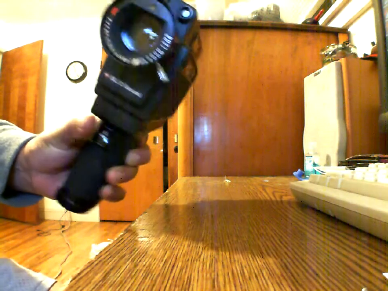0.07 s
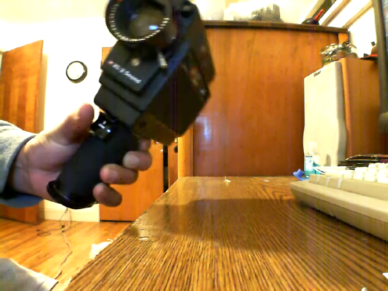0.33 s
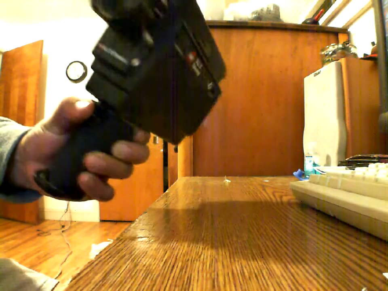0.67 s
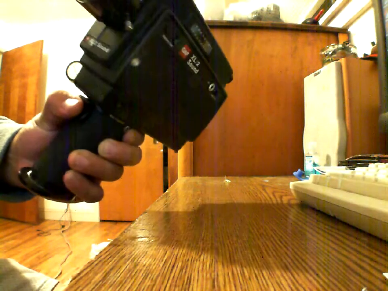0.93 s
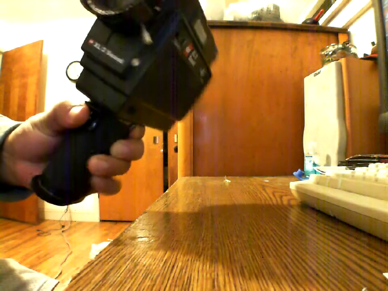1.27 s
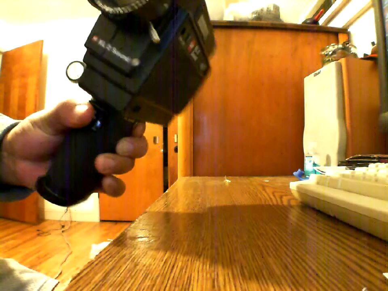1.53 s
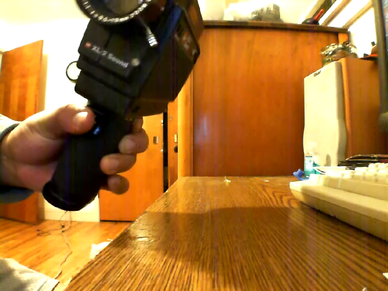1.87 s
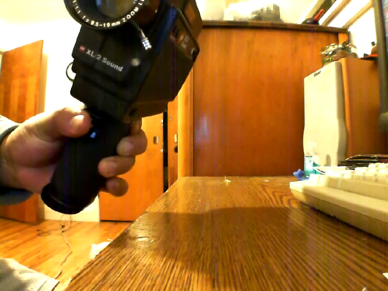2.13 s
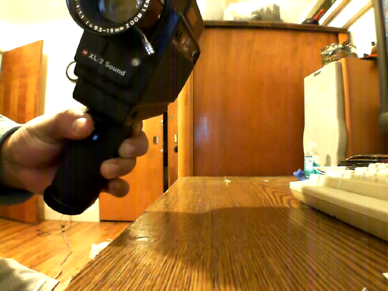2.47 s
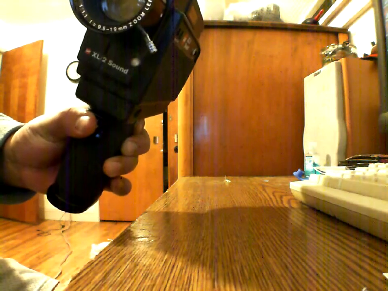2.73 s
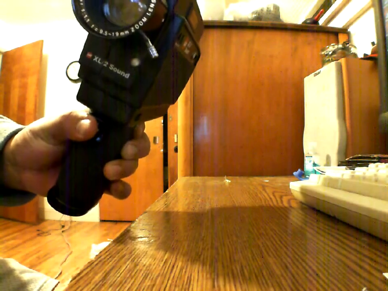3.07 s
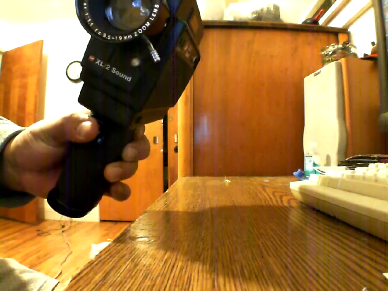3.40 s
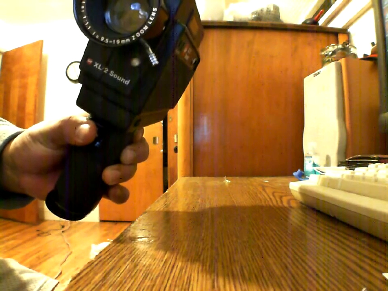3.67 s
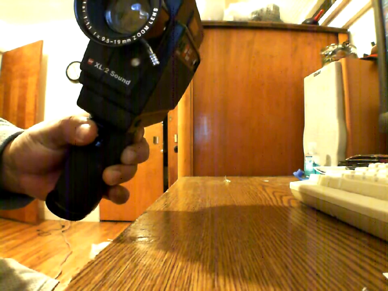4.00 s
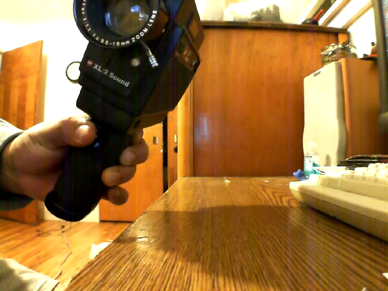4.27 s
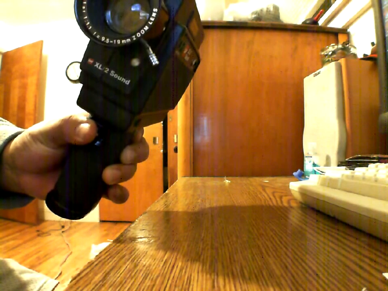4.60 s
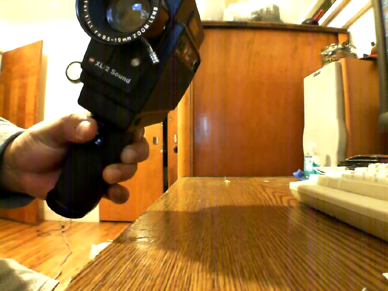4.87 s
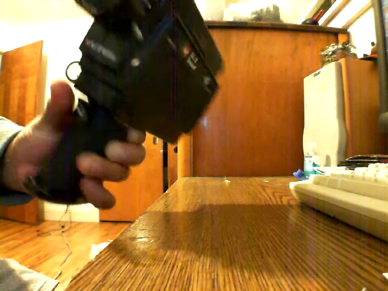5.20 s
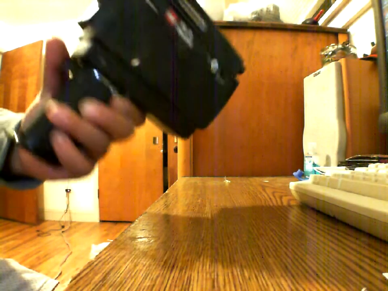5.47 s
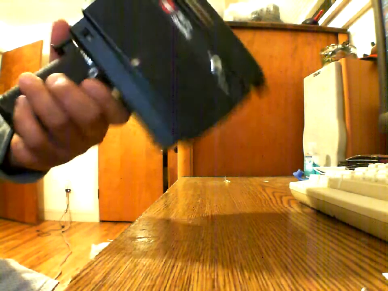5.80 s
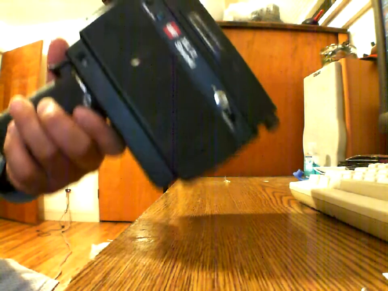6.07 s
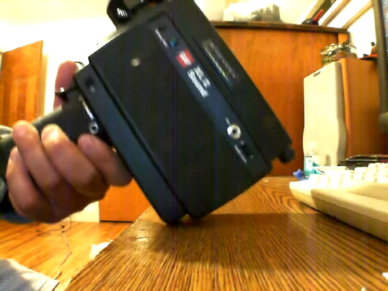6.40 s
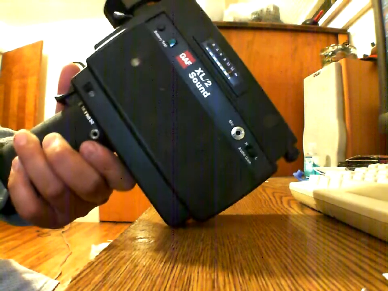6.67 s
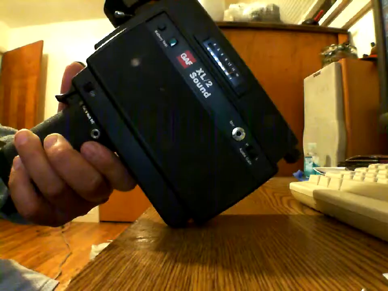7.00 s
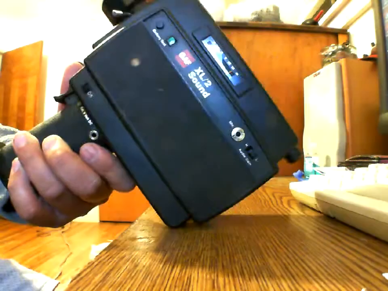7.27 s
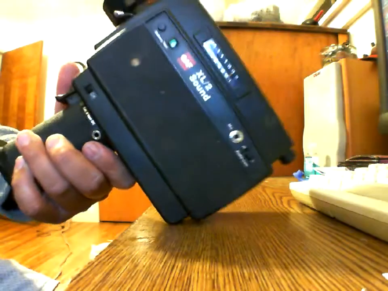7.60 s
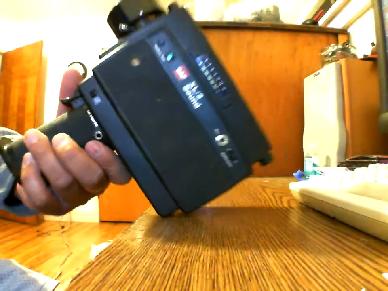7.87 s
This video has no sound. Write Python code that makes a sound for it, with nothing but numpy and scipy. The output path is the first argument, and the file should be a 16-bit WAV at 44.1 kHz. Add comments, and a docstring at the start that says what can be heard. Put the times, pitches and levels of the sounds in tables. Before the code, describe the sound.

A hand-held film camera is heard close up in a small room, over faint hiss, a low hum and a thin high whine. Its plastic grip gives a few tiny creaks, then at about 0.8 seconds the trigger latches with a small ping and the motor starts. The gears whirr steadily with fine, rapid ticking, about seventeen ticks a second, slowing very slightly. A dull knock comes near 1 second, and more soft knocks and rubs on a wooden table join between 3.2 and 4.3 seconds. At 5 seconds the trigger springs back with a loud, sharp click and the motor stops. A few light creaks and a soft knock follow. At 6.5 seconds the camera lands on the table with a brief chatter and a low wooden boom. Small plastic clicks, light taps and faint rubbing across the wood continue until about 8 seconds.

```python
"""A hand-held home-movie camera close to a desk microphone, over the air and hum of a small room.
The plastic grip creaks in tiny slips, then the trigger latches with a ping. For four seconds the gears
whirr and the claw ticks through the case about 17 times a second, joined late by dull knocks and rubs
on a wooden table. At 5 s the trigger cracks back and the motor stops. At 6.5 s the camera lands with
a chatter and a boom of the table, then is shifted a little across the wood."""
import sys
import numpy as np
from scipy import signal
from scipy.fft import rfft, irfft
from scipy.io import wavfile

SR = 44100
rng = np.random.default_rng(int(sys.argv[2]) if len(sys.argv) > 2 else 0)


def bounce(signal):
    """Save signal as a 16-bit WAV file at the path given by the first command-line argument."""
    frames = np.transpose(np.atleast_2d(signal))
    limited = np.clip(frames, -1, 1)
    pcm = np.round(limited * 32767).astype(np.int16)
    wavfile.write(sys.argv[1], SR, pcm)


N = 350154
TIME = np.arange(N) / SR

# claw and shutter contacts within one film frame: share of the cycle, level/dB
CLAW_CONTACTS = [(.0, -8), (0.048, -5.5), (0.152, -16), (0.368, -6), (.43, -6.5), (.57, -13.5), (.86, -7),
                 (.93, -2.5)]
# resonances of the camera case: f/Hz, width/Hz, level/dB
CASE_RESONANCES = [(432, 18, 10), (705, 100, -0.5), (846, 177, 0), (1283, 56, -3), (1424, 52, 2.5),
                   (2074, 120.4, -2.5), (2290, 300, -6.5), (2903, 39, -1.5), (3170, 320, -7.5),
                   (3900, 1100, -7), (4480, 510, -7.5), (4670, 250, -8), (5260, 180, -10.5),
                   (6270, 170, -12.5), (7280, 440, -15.5), (8900, 400, -22)]
# spectrum of the claw's bright tick: f/Hz, level/dB
TICK_COLOUR = [(700, -17.5), (2000, 2.5), (2700, -2.5), (3400, 7.5), (4050, -1), (4700, 7), (4950, -16),
               (5300, -3.5), (6500, -7), (7400, -3), (8300, -9), (9100, -7.5), (9600, -11.5), (15000, -19)]
# the trigger latches in two steps: t/s, level/dB, treble roll-off/Hz
LATCH_STEPS = [(0.8412, -40, 6000), (.853, -45.5, 6000)]
# the latch spring's ping: f/Hz, level/dB, t60/s
LATCH_MODES = [(3256, 4.5, 0.041), (3900, -15, .04)]
# the trigger springs back, hits its stop (second row) and rebounds: t/s, level/dB, t60/s
RELEASE_CONTACTS = [(5.0027, -23, 0.076), (5.0064, -4, 0.014), (5.0095, -20.5, 0.024), (5.026, -39, .025),
                    (5.0448, -18, 0.024)]
# spectrum of the trigger's crack: f/Hz, level/dB
RELEASE_COLOUR = [(250, -34), (420, -7), (620, -22.5), (820, -9), (1000, -31), (1290, -8), (1700, -15.5),
                  (2150, -11.5), (2550, -19), (3000, -1.5), (3800, -8.5), (4500, -8), (5200, -9.5),
                  (6600, -10.5), (9500, -12), (12000, -12.5), (15500, -30.5)]
# the ring after that crack: f/Hz, level/dB, t60/s
RELEASE_MODES = [(420, -29, 0.12), (452.4, -56, 0.062), (820, -27.5, 0.051), (1300, -38, .035),
                 (2205, -29.5, 0.045), (3100, -34, .018), (4560, -11, 0.022), (5120, -6.5, .011),
                 (6500, -15.5, 0.021), (7200, -36, .02)]
# the grip creaks under the fingers: t/s, level/dB, brightness (0 dull, 1 sharp), number of slips
CREAKS = [(0.0219, -37, 0.52, 1), (0.2165, -38, 0.47, 1), (.241, -38, .38, 3), (0.3194, -37.5, 0.4, 1),
          (0.3868, -37, .35, 1), (0.662, -49.5, 0.74, 1), (1.049, -40, 0.35, 1), (1.499, -39.5, 0.4, 2),
          (4.9902, -35.5, 0.63, 1), (5.1989, -34, .28, 1), (5.738, -34.5, 0.81, 1), (5.751, -39.5, 0.45, 1),
          (6.8763, -37.5, 0.6, 1), (7.0876, -36, 0.65, 1), (7.3424, -41.5, 0.089, 1), (7.3761, -45.5, 1, 1),
          (7.469, -41.5, 1, 1)]
# spectrum of a plastic slip: f/Hz, level/dB
SLIP_COLOUR = [(590, -33), (1000, -12.5), (1470, -10.5), (1750, -8.5), (2140, -8), (2770, -8), (3090, -7.5),
               (3590, -4.5), (4300, -3.5), (5810, -6.5), (7360, -1), (8280, -6.5), (9030, 0.5),
               (11400, -17), (13000, -27)]
# ring of the grip: f/Hz, level/dB, t60/s
GRIP_MODES = [(1474, -18.5, 0.028), (2160, -17, 0.028), (3214, -10.5, 0.024), (3490, -16, 0.032),
              (4140, -5.5, 0.015), (4870, -13, 0.0043), (7400, -2, 0.011)]
# the camera lands on a corner, tips onto the next and later rocks:
# t/s, level/dB, gap between touches/s, loss per touch/dB, number of touches
LANDINGS = [(6.4797, -11.5, .01115, 4.5, 4), (6.5565, -23, .0157, 32, 3), (7.592, -41.5, .016, -2, 2)]
# dull knocks on the table: t/s, level/dB, treble roll-off/Hz, pitch the struck spot favours/Hz
KNOCKS = [(1.0507, -26.5, 850, 516), (3.1663, -27, 3500, 441), (3.199, -31.5, 700, 461),
          (3.269, -34.5, 600, 461), (3.567, -33, 3500, 700), (3.96, -33.5, 800, 714),
          (3.984, -30.5, 1100, 640), (4.017, -31, 900, 370), (4.066, -29.5, 1210, 635),
          (5.837, -33.5, 750, 370), (7.344, -38.5, 2470, 618), (7.382, -38, 1500, 630)]
# woody ring of the table top: f/Hz, level/dB, t60/s
TABLE_MODES = [(247, -19, 0.081), (369, -19.5, 0.13), (461.5, -1.5, 0.04), (515.4, -9, 0.12),
               (621, -5.5, 0.042), (700, -7.5, 0.028), (845, -9, 0.087), (913, -25.5, 0.078),
               (1240, -6, 0.026), (1650, -54, 0.0072), (2210, -5, 0.011), (2700, 0, 0.0091)]
# sway and boom of the whole table: f/Hz, level/dB, t60/s
BOOM_MODES = [(24.7, -20.5, 0.86), (53.3, -16.5, 0.48), (70.6, -2, 0.1), (91, 0.5, 0.051),
              (118, -1.5, 0.089), (170, -9.5, 0.057), (262, -4, 0.038)]
# rubbing strokes on the table: t/s, length/s, level/dB
RUBS = [(3.275, 0.15, -50), (3.534, 0.068, -49), (3.854, 0.037, -44.5), (4.017, 0.059, -42),
        (4.27, 0.052, -51.5), (5.635, .06, -56), (5.83, 0.091, -62), (6.58, 0.33, -63), (7.45, 0.056, -54),
        (7.57, .04, -46), (7.675, 0.24, -54.5)]
# spectrum of the rubbing: f/Hz, level/dB
RUB_COLOUR = [(30, -1), (60, -5.5), (110, -4), (170, -15), (280, -9), (380, -4.5), (460, 0), (560, -8),
              (700, -7.5), (900, -15), (1050, -33), (2500, -34), (6000, -55)]
# spectrum of room air and microphone hiss: f/Hz, level/dB
AIR_COLOUR = [(15, 4), (60, 2), (95, -5), (170, -6.5), (260, -6.5), (370, -9), (540, -9), (700, -17),
              (1300, -21), (3000, -25), (7000, -26.5), (11000, -25), (15700, -24.5)]
# fan hum and electrical whine: f/Hz, level/dB, width/Hz
HUMS = [(116.24, -57, 5.3), (241, -67, 17), (15735, -68.5, 8)]


def motor(start_s=.86, first_frame_s=.8943, stop_s=5.0, running_db=-49, gear_db=9.5, tick_db=-2.5):
    """Claw and shutter repeat their contacts on every frame; meshing gears whirr through the case."""
    sag_s = np.clip(TIME, 1.75, 3.95) - 1.75
    frames_per_s = 17.356 - .2836 * sag_s   # the motor slows a little under load
    frames = np.cumsum(frames_per_s) / SR
    frames -= np.interp(first_frame_s, TIME, frames)
    share, db = np.transpose(CLAW_CONTACTS)
    cycle = np.arange(int(frames[int(stop_s * SR)]) + 1)[:, None] + share
    times = np.interp(cycle, frames, TIME) + .00084 * rng.standard_normal(cycle.shape)
    gains = from_db(db + .6 * rng.standard_normal(cycle.shape))
    running = (TIME > start_s) & (TIME < stop_s)
    claw = rms_one(running * crack(pulses(times.ravel(), gains.ravel()), t60=.031))
    teeth = rms_one(running * rng.standard_normal(N) * (rng.random(N) < 3000 / SR))
    drive = claw + from_db(gear_db) * teeth + 1e-18
    case = sum((-1) ** k * from_db(level) * resonate(drive, hz, width)
               for k, (hz, width, level) in enumerate(CASE_RESONANCES))
    whirr = rms_one(case) + from_db(tick_db) * colour(claw, TICK_COLOUR)
    spin_up_db = -6 * np.exp(-np.maximum(TIME - start_s, 0) / .067)   # swells as the gears take the load
    return from_db(running_db + spin_up_db) * rms_one(whirr) * np.sqrt(running.mean())


def trigger(crack_db=-1.5, ring_db=3.5, soft_hz=9020):
    """The trigger latches with a small ping; released, it cracks against its stop and rings the case."""
    ping = strike(LATCH_STEPS, LATCH_MODES, spread_db=1)
    contacts = sum(crack(pulses([s], [from_db(db)]), t60) for s, db, t60 in RELEASE_CONTACTS)
    impact_s = RELEASE_CONTACTS[1][0]
    ring = strike([(impact_s, ring_db, soft_hz)], RELEASE_MODES, spread_db=0)
    return ping + from_db(crack_db) * colour(contacts, RELEASE_COLOUR) + ring


def slips(creak_gap_s=.0167, loss_db=1):
    """Fingers, trigger and landings make the shell slip: rows of t/s, level/dB, brightness."""
    creaks = [(s + k * creak_gap_s, db - k * loss_db, bright)
              for s, db, bright, count in CREAKS for k in range(round(count))]
    tightening_hand = [(s, -46.5, .3) for s in rng.uniform(.59, .71, size=3)]
    latch_clicks = [(s, db + 3, .37) for s, db, _ in LATCH_STEPS]
    # the loose shell rattles at every touch, brighter as the contacts get lighter
    rattles = [(s + k * gap, -21 + .83 * db - k * loss_db, .067 + k * .09)
               for s, db, gap, _, count in LANDINGS for k in range(round(count))]
    return creaks + tightening_hand + latch_clicks + rattles


def grip(t60=.012, dull_hz=4110, snap_db=8.5, edge_db=7, ring_db=4):
    """Plastic shells slip against each other, snap and ring briefly; softer contacts lose treble."""
    times, db, bright = np.transpose(slips())
    sharp = crack(pulses(times, from_db(db) * bright), t60)
    dull = butter(crack(pulses(times, from_db(db) * (1 - bright)), t60), dull_hz, "low")
    edge = butter(crack(pulses(times, from_db(db) * bright ** 4), t60), 9000, "high")
    hits = np.column_stack([times, db + ring_db, dull_hz * (1 + bright)])
    ring = strike(hits, GRIP_MODES, spread_db=2)
    return from_db(snap_db) * colour(sharp + dull, SLIP_COLOUR) + from_db(edge_db) * edge + ring


def landings(top_soft_hz=553, boom_soft_hz=258, lag_s=.00164):
    """The camera chatters down: just after the shell, the top rings and the whole table booms."""
    touches = [(s + k * gap + lag_s, db - k * loss)
               for s, db, gap, loss, count in LANDINGS for k in range(round(count))]
    top = strike([(s, db, top_soft_hz) for s, db in touches], TABLE_MODES, spread_db=2, spot_hz=656)
    boom = strike([(s, db, boom_soft_hz) for s, db in touches], BOOM_MODES, spread_db=1)
    return top + boom


def knocks():
    """Single soft blows ring the table top."""
    rows = np.array(KNOCKS)
    return strike(rows[:, :-1], TABLE_MODES, spread_db=1.5, spot_hz=rows[:, -1])


def rubbing(attack_s=.022, t60=.28, grain_db=3.5, grains_per_s=120, rumble_db=-1):
    """Stick-slip strokes swell, hold and fade; with the camera's weight on the wood they also rumble."""
    strokes = np.zeros(N)
    for s, length, db in RUBS:
        attack = np.clip((TIME - s) / attack_s, 0, 1)
        fade_db = 60 * np.clip(TIME - s - length, 0, 1) / t60
        strokes += attack * from_db(db - fade_db)
    grain = from_db(grain_db * np.interp(TIME * grains_per_s, np.arange(1000), rng.standard_normal(1000)))
    scrape = colour(rms_one(grain * rng.standard_normal(N)), RUB_COLOUR)
    rumble = rms_one(butter(rng.standard_normal(N), 120, "low"))
    landed = TIME > LANDINGS[0][0]
    return strokes * (scrape + from_db(rumble_db) * landed * rumble)


def room(x, t60=.28, build_s=.0021):
    """Diffuse reflections build up quickly and die away."""
    t = TIME[:SR // 2]
    tail = rng.standard_normal(len(t)) * from_db(-60 * t / t60) * np.clip(t / build_s, 0, 1)
    walls = butter(tail / np.linalg.norm(tail), [200, 11000], "band")
    return signal.fftconvolve(x, walls)[:N]


def background(air_db=-53.5, whine_hz=13500.5, drop_s=7.087):
    """Room air, a wavering fan hum and a sensor whine that drops an octave as its frame rate halves."""
    air = from_db(air_db) * colour(rng.standard_normal(N), AIR_COLOUR)
    hum = np.zeros(N)
    for hz, db, width in HUMS:
        band = resonate(rng.standard_normal(N), hz, 2 * width)
        hum += from_db(db) * rms_one(resonate(band, hz, 2 * width))
    phase = 2 * np.pi * whine_hz * TIME
    high_whine = from_db(-64.5) * np.sin(phase)
    low_whine = from_db(-74) * (np.sin(phase / 2) + .7 * np.sin(phase))
    return air + hum + np.sqrt(2) * np.where(TIME < drop_s, high_whine, low_whine)


def strike(hits, modes, spread_db, spot_hz=None):
    """Hits (t/s, level/dB, treble roll-off/Hz) ring every mode; soft contacts spare the high ones."""
    times, hit_db, soft_hz = np.transpose(hits)
    scatter_db = spread_db * rng.standard_normal((len(hits), len(modes)))
    out = np.zeros(N)
    for k, (hz, db, t60) in enumerate(modes):
        r, w = from_db(-60 / (t60 * SR)), 2 * np.pi * hz / SR
        # the struck spot lifts the mode at its favoured pitch
        spot_db = 0 if spot_hz is None else 6.5 * np.exp(-(np.log2(hz / spot_hz) / .05) ** 2)
        gains = from_db(hit_db + db + spot_db + scatter_db[:, k]) / np.sqrt(1 + (hz / soft_hz) ** 6)
        ring = signal.lfilter([0, np.sin(w)], [1, -2 * r * np.cos(w), r * r], pulses(times, gains))
        out += resonate(ring, hz, hz / 2)   # a mode takes about a cycle to swell
    return out


def crack(pushes, t60):
    """Each push sets off a burst of tiny contacts that dies away."""
    envelope = signal.lfilter([1], [1, -from_db(-60 / (t60 * SR))], pushes)
    return envelope * rng.standard_normal(N)


def pulses(times, gains):
    """One-sample pushes at the given times."""
    return np.bincount(np.round(np.asarray(times) * SR).astype(int), gains, N)[:N] + 1e-18


def colour(x, spectrum, size=8192):
    """Minimum-phase EQ with the given curve; white noise keeps its power."""
    hz, db = np.transpose(spectrum)
    log_hz = np.log(np.maximum(np.fft.rfftfreq(size, 1 / SR), 1))
    low_cut_db = 20 * np.maximum(np.log(hz[0]) - log_hz, 0)
    curve = from_db(np.interp(log_hz, np.log(hz), db) - low_cut_db)
    cepstrum = irfft(np.log(curve))
    cepstrum[1:size // 2] *= 2
    cepstrum[size // 2 + 1:] = 0
    response = irfft(np.exp(rfft(cepstrum)))
    return signal.fftconvolve(x, response / np.linalg.norm(response))[:N]


def resonate(x, hz, width_hz):
    """Two-pole resonance with unity gain at its peak."""
    r, w = np.exp(-np.pi * width_hz / SR), 2 * np.pi * hz / SR
    return signal.lfilter(np.array([1, 0, -1]) * (1 - r * r) / 2, [1, -2 * r * np.cos(w), r * r], x)


def butter(x, hz, kind):
    """Low-, high- or band-pass at 12 dB per octave."""
    return signal.sosfilt(signal.butter(2, hz, kind, fs=SR, output="sos"), x)


def from_db(db):
    """Decibels to gain."""
    return 10 ** (np.asarray(db) / 20)


def rms_one(x):
    """Scale to unit rms."""
    return x / np.sqrt(np.mean(x ** 2) + 1e-20)


def scene():
    """The camera is heard through the air; the table also reaches the microphone standing on it."""
    camera = motor() + grip() + trigger()
    wood = knocks() + landings() + rubbing()
    reverb = room(from_db(-10.5) * camera + from_db(-12) * wood)
    return (camera + wood + reverb + background())[None]


def record(dry):
    """The loudest peak overloads, the top is cut, and the converter rests a little below zero."""
    ceiling, cutoff_hz, offset = .78, 16600, -.0365
    top_cut = signal.cheby2(20, 70, cutoff_hz, fs=SR, output="sos")
    return signal.sosfilt(top_cut, np.clip(dry, -ceiling, ceiling)) + offset


dry = scene()
out = record(dry)
bounce(out)
```